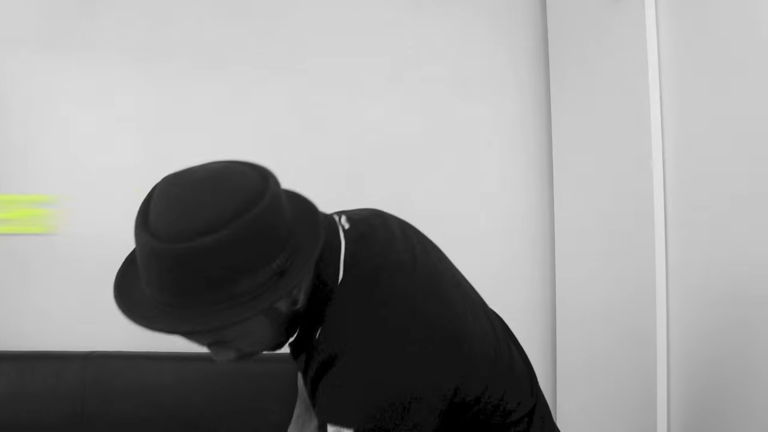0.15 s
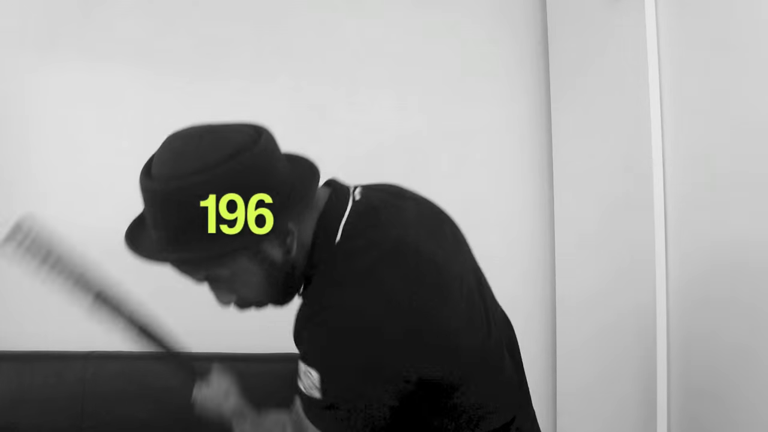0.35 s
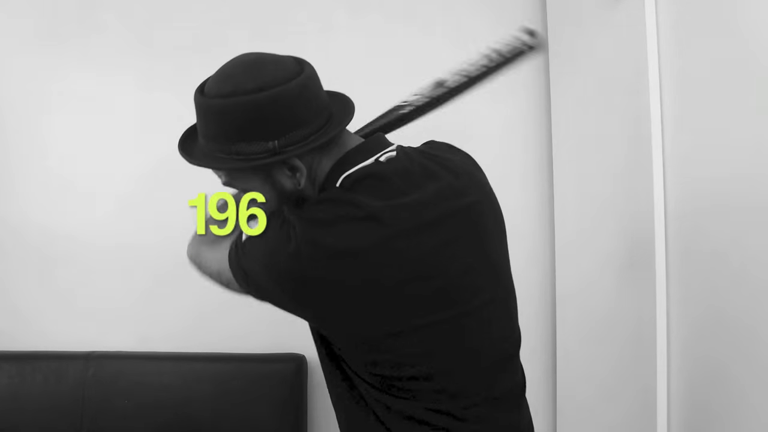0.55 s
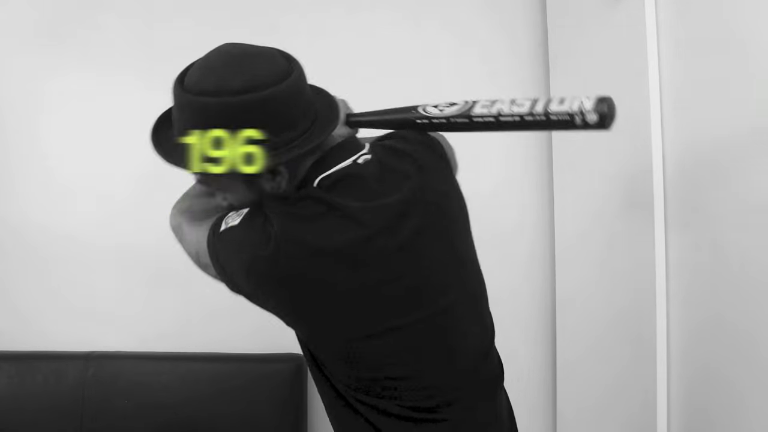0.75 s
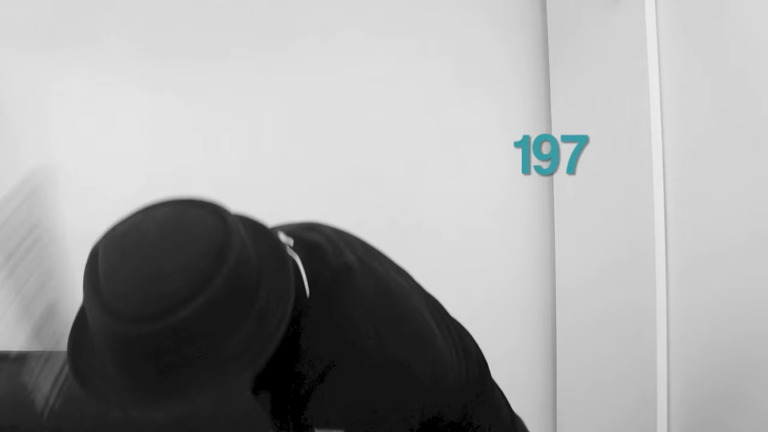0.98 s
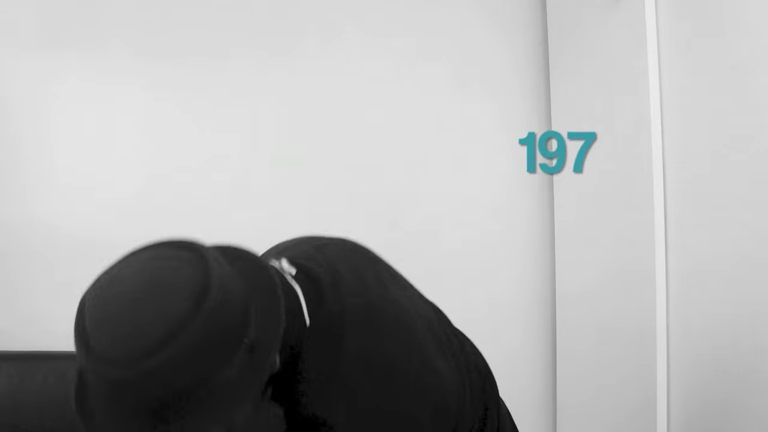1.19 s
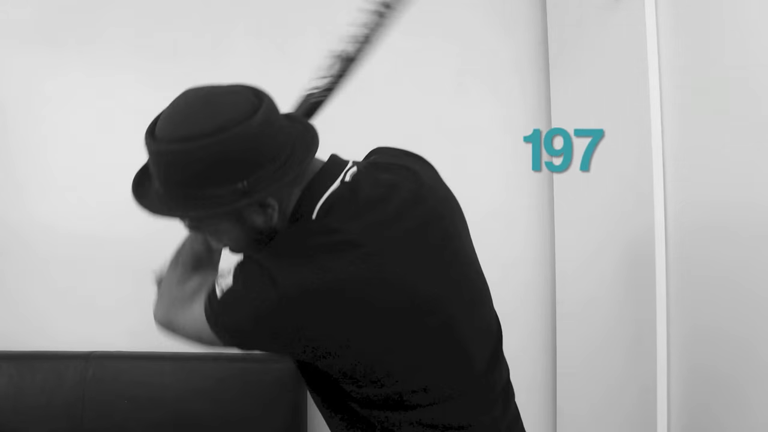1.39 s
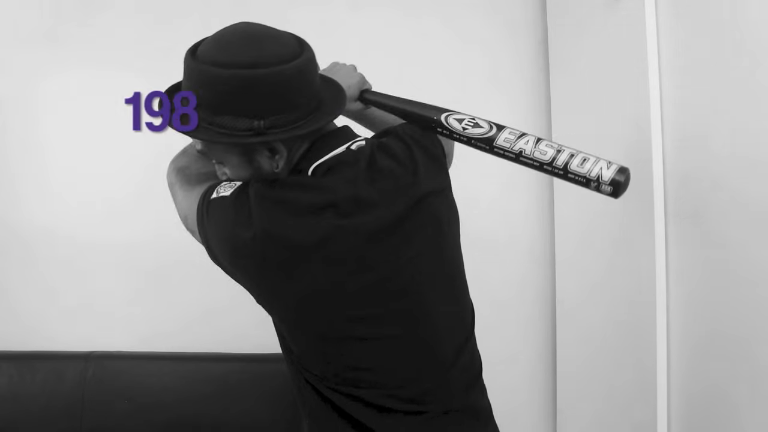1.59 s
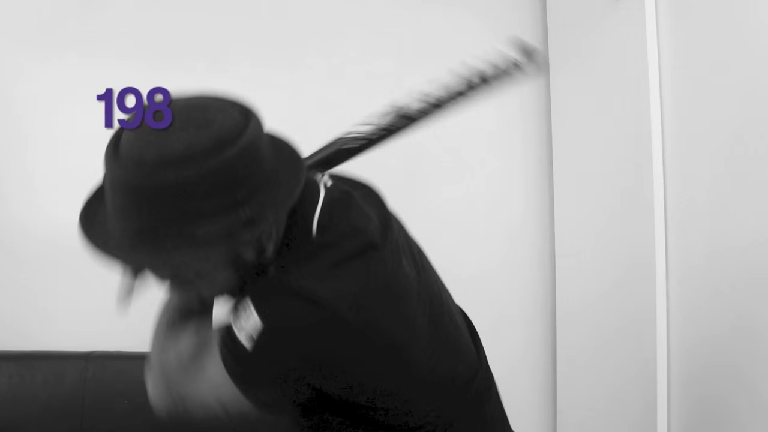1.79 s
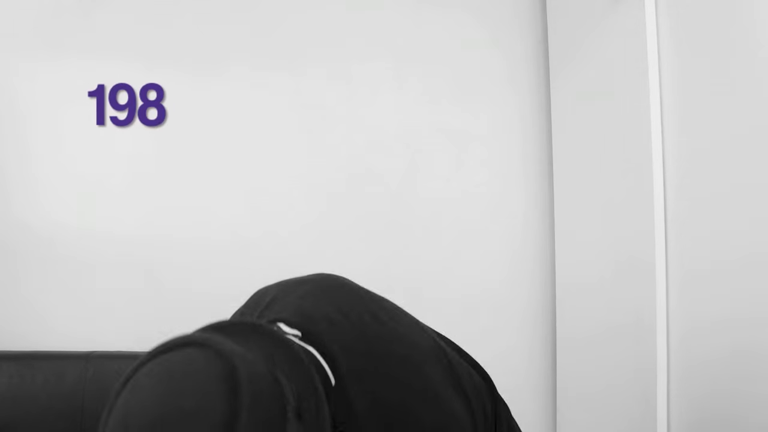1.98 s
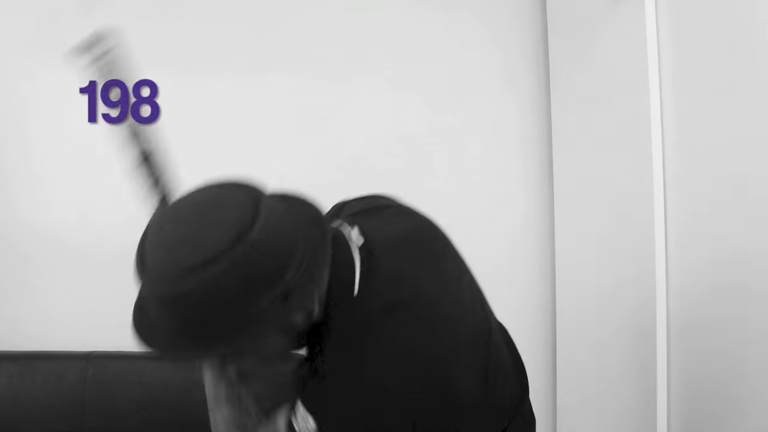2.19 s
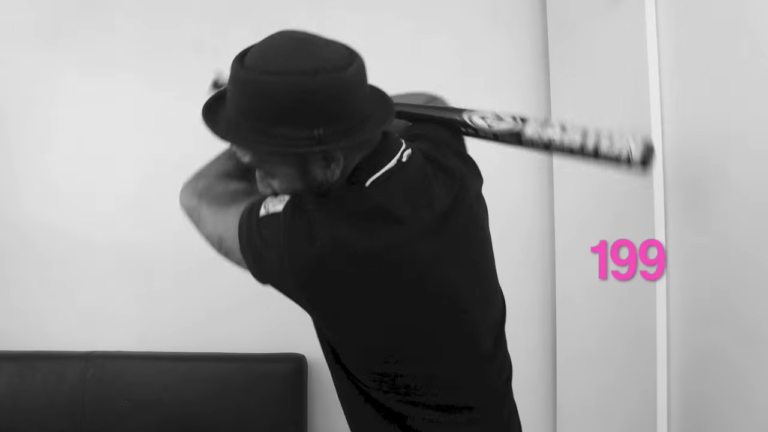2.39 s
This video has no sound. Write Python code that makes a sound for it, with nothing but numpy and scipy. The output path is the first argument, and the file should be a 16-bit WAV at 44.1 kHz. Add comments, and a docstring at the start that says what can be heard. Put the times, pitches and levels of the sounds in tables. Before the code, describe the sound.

Three hard bat whacks on heaped clothes, sharp cloth slaps over dull thuds, in a small room

```python
"""Three hard cloth slaps over dull thuds: a bat comes down on clothes heaped on a bed in a small bare room.
Each slap is a pulse convolved with diffuse reflections; the thud and crushed cloth are shaped noise,
and decaying sines give the push into the mattress and the modes that hum on.
Between blows the cloth rustles and swishes as grained or banded noise, and the bed bumps softly.
A faint hiss lies beneath; the loudest peaks saturate the microphone."""
import sys
import numpy as np
from scipy import signal
from scipy.fft import rfft, irfft, next_fast_len
from scipy.io import wavfile
from scipy.ndimage import uniform_filter1d

SR = 44100
rng = np.random.default_rng(int(sys.argv[2]) if len(sys.argv) > 2 else 0)


def int16_out(signal):
    """Quantize to a 16-bit WAV file."""
    q = np.round(np.clip(np.atleast_2d(signal).T, -1, 1) * 32767)
    wavfile.write(sys.argv[1], SR, q.astype(np.int16))


N = 108045
T = np.arange(SR) / SR  # time axis of one event [s]
TOP_HZ = 15850  # upper band limit


def amp(db):
    """Level as gain: 20 dB is a factor of ten in amplitude."""
    return 10 ** (np.asarray(db) / 20)


def unit(x):
    """Normalization to an rms of 1."""
    return x / np.sqrt(np.mean(x ** 2) + 1e-20)


def along(points, hz):
    """Linear interpolation of (frequency [Hz], value) points on a logarithmic frequency axis."""
    f, v = np.transpose(points)
    return np.interp(np.log(hz + 1), np.log(f + 1), v)


def filtered(x, response):
    """Linear filtering: the spectrum multiplied by a frequency response."""
    n = x.shape[-1]
    m = next_fast_len(n + SR // 4)  # padding against wrap-around
    return irfft(rfft(x, m) * response(np.fft.rfftfreq(m, 1 / SR)), m)[..., :n]


def add(track, s, x):
    """Superposition: x is summed into the track from time s."""
    i = max(0, round(s * SR))
    track[:, i:i + x.shape[-1]] += x[..., :max(0, N - i)]


def band(hz, octaves):
    """Bell-shaped band response around hz, symmetric in octaves."""
    return lambda f: 1 / (1 + (np.log2((f + 1) / hz) / octaves) ** 2 / 2) ** 2


def spectrum(points):
    """Frequency response through (frequency [Hz], level [dB]) points."""
    return lambda f: amp(along(points, f))


def tilt(hz, db):
    """Spectral slope in dB per octave, flattening at the lowest frequencies."""
    return amp(db * np.log2((hz + 100) / 1000))


def envelope(t, rise, hold, t60):
    """Linear rise, hold, then exponential decay by 60 dB in t60."""
    return np.clip(t / rise, 0, 1) * amp(-60 * np.maximum(t - rise - hold, 0) / t60)


def mode(t, hz, t60, rise):
    """Damped resonance: a sine of random phase that swells and decays exponentially."""
    swell = 1 - np.exp(-t / rise)
    return swell * amp(-60 * t / t60) * np.sin(2 * np.pi * (hz * t + rng.random()))


def grain(n, db, size):
    """Amplitude modulation by smoothed noise, db deep (rms)."""
    return amp(db * unit(uniform_filter1d(rng.standard_normal(n), size)))


def diffuse(n, response):
    """Diffuse field: coloured noise whose left-right correlation varies with frequency; rms 1."""
    # correlation of the two channels: (frequency [Hz], likeness [1], limited to -1..1 below)
    alike = [(100, 0.99), (700, .95), (1300, 0.82), (2300, 0.6), (3500, 0.47), (5000, 0.04), (6500, -0.38),
             (9000, -1.1), (14000, 0.23)]

    def mid_side(f):
        turn = np.arccos(np.clip(along(alike, f), -1, 1)) / 2
        return response(f) * np.array([np.cos(turn), np.sin(turn)])

    mid, side = filtered(rng.standard_normal((2, n)), mid_side)
    return unit(np.array([mid + side, mid - side]))


def blows():
    """Impact: air is pressed out, then the blow excites cloth, mattress and room at once."""
    # the three blows: (time [s], slap level [dB], slap tilt [dB/octave], thud level [dB],
    # thud pitch [Hz], thud width [octaves], ring level [dB], air squeeze level [dB])
    strokes = [(0.2464, 25.5, -1, -13.5, 365, 0.46, 0, -17), (1.1714, 23, -1.5, -13.5, 507, 1, 1.5, -25),
               (2.066, 26, -1, -10, 660, 0.23, 2, -20)]
    out = np.zeros((2, N))
    squeeze_s = 0.00702  # the air starts this long before the blow lands
    for s, slap_db, tilt_db, thud_db, thud_hz, width, ring_db, squeeze_db in strokes:
        impact = slap(slap_db, tilt_db) + crush() + thud(thud_db, thud_hz, width)
        add(out, s, impact + push() + ring(ring_db) + boom())
        add(out, s - squeeze_s, squeeze(squeeze_db, squeeze_s))
    return out


def slap(db, tilt_db):
    """Convolution: the room's impulse response excited by the cloth's short pulse."""
    # spectrum of the cloth slap: (frequency [Hz], level [dB])
    slap_points = [(30, -23), (90, -11.5), (170, -5), (300, 3.5), (600, -0.5), (1200, 5.5), (2500, 7.5),
                   (4000, 4), (7000, 4), (10000, -1), (13000, -8.5), (15500, -41)]
    pulse = click(slap_points, tilt_db)
    return amp(db) * signal.fftconvolve(room(T), pulse[None], axes=1)[:, :SR]


def click(points, tilt_db, size=2048):
    """Minimum phase: the folded cepstrum gives the most compact causal pulse of a spectrum."""
    hz = np.fft.rfftfreq(size, 1 / SR)
    cepstrum = irfft(np.log(amp(along(points, hz)) * tilt(hz, tilt_db)))
    cepstrum[1:size // 2] *= 2
    cepstrum[size // 2 + 1:] = 0
    return irfft(np.exp(rfft(cepstrum)))


def room(t):
    """Reverberation: direct sound, then dense reflections that build up and decay band by band."""
    # reverberation time: (frequency [Hz], t60 [s])
    room_t60 = [(60, .35), (200, 0.32), (700, 0.37), (2000, 0.27), (6000, 0.32), (14000, 0.26)]
    hold_s, build_s = 0.022, 0.042  # build_s: time for a rise of 1 in gain
    first, direct = 0.49, 0.08  # gain of the first reflections, direct pulse
    hz, s, z = signal.stft(diffuse(len(t), np.ones_like), SR, nperseg=256)
    fade = amp(-60 * np.maximum(s - hold_s, 0) / along(room_t60, hz)[:, None])
    tail = signal.istft(z * fade, SR)[1][:, :len(t)]
    tail *= np.minimum(first + t / build_s, 1)
    tail /= np.linalg.norm(tail[0])
    tail[:, 0] += direct
    return tail


def crush():
    """Friction: the pile of cloth crushed under the bat crackles as modulated bright noise."""
    # spectrum of the crushed cloth: (frequency [Hz], level [dB])
    crush_points = [(60, -8), (110, -9.5), (300, 4), (800, 1.5), (1500, 0.5), (2700, 0), (5000, 0),
                    (10000, -9), (15500, -17)]
    crackle = unit(grain(SR, 2, size=50) * diffuse(SR, spectrum(crush_points)))
    return amp(-12) * envelope(T, rise=0.0097, hold=0.024, t60=0.084) * crackle


def thud(db, hz, width):
    """Heavily damped body: a low band of noise with an abrupt onset and short decay."""
    return amp(db) * diffuse(SR, band(hz, width)) * envelope(T, 0.0003, hold=0.011, t60=0.12)


def push():
    """Damped resonance of the mattress as it gives way."""
    return amp(-12.5) * mode(T, hz=176, t60=0.19, rise=0.0011)


def ring(db):
    """Modal superposition: the blow sets resonances of bed and room ringing."""
    # modes: (frequency [Hz], level before a small random spread [dB], t60 [s], rise time constant [s])
    resonances = [(177.9, -23, 0.2, 0.0092), (199, -23.5, 0.23, 0.0073), (342, -19.5, 0.23, 0.0023),
                  (458.5, -23, 0.2, 0.0055), (536.7, -17.5, 0.29, 0.0072), (714, -11.5, 0.15, 0.0041),
                  (1061, -17.5, 0.22, 0.0027), (1280, -22, 0.22, .01), (1959, -24, 0.35, 0.0049)]
    total = 0
    for hz, mode_db, t60, rise in resonances:
        level_db = db + mode_db + rng.normal(0, 0.6)
        total = total + amp(level_db) * mode(T, hz, t60, rise)
    return total


def boom():
    """Lowest room mode: a standing wave that swells and decays."""
    return amp(-20) * lowest_mode()


def lowest_mode():
    """Eigenfrequency of the room, at full amplitude before swell and decay."""
    return mode(T, hz=54.4, t60=0.4, rise=0.03)


def squeeze(db, rise_s):
    """Turbulence: air pressed out swells as low-passed noise until the blow lands."""
    air = diffuse(SR, lambda f: 1 / (1 + (f / 1030) ** 10))  # upper edge [Hz]
    return amp(db) * envelope(T, rise_s, 0, t60=0.0072) * air


def rustles():
    """Sliding friction: dragged and shifted cloth gives short, finely grained noise."""
    # strokes: (time [s], level [dB], rise [s], hold [s], t60 [s], tilt [dB/octave])
    drags = [(0, -39, 0.0067, 0.03, 0.8, -2), (0.165, -42.5, 0.058, 0.012, 0.41, -1),
             (0.509, -37.5, 0.034, 0.02, 0.79, 1.16), (0.668, -47, 0.018, 0.089, 0.33, -1),
             (0.982, -40, .005, 0.007, 0.14, 1), (1.3, -43.5, 0.025, 0.095, 0.97, -0.5),
             (1.462, -41, .004, 0.0089, 0.39, 2.5), (1.517, -47, .06, 0.098, 0.22, 0),
             (2.2, -43, 0.042, 0.091, 0.39, -1.5), (2.362, -43.5, 0.021, 0.072, .5, .5)]
    # spectrum of sliding cloth: (frequency [Hz], level [dB])
    cloth_points = [(40, -35), (150, -9.5), (300, 2), (800, -2.5), (2500, -1), (4500, -3.5), (8000, -4.5),
                    (11500, -12), (15000, -27)]
    out = np.zeros((2, N))
    for s, db, rise, hold, t60, tilt_db in drags:
        cloth = diffuse(SR, lambda f: spectrum(cloth_points)(f) * tilt(f, tilt_db))
        texture = unit(grain(SR, 2, size=120) * cloth)
        add(out, s, amp(db) * envelope(T, rise, hold, t60) * texture)
    return out


def noise_bursts(events):
    """Band-limited noise under an envelope, one burst for each event."""
    out = np.zeros((2, N))
    for s, db, hz, width, rise, hold, t60 in events:
        add(out, s, amp(db) * envelope(T, rise, hold, t60) * diffuse(SR, band(hz, width)))
    return out


def swishes():
    """Fabric friction in a limited band: brief bright swishes."""
    # swishes: (time [s], level [dB], centre [Hz], width [octaves], rise [s], hold [s], t60 [s])
    strokes = [(0.015, -44.5, 2800, 0.45, .02, 0.041, 0.11), (1.0, -53, 5060, 0.18, .015, 0.027, .15),
               (1.66, -54, 1480, 0.28, .03, 0.025, 0.12), (1.755, -55, 2390, 0.74, .005, 0.083, .15),
               (1.792, -46, 6600, 0.63, .08, 0.037, 0.24)]
    return noise_bursts(strokes)


def bumps():
    """Damped structures: bed and floor answer in low bumps and narrow-band creaks."""
    # bumps: (time [s], level [dB], centre [Hz], width [octaves], rise [s], hold [s], t60 [s])
    knocks = [(0, -31.5, 278, 0.45, 0.00075, 0.012, 0.26), (.139, -39.5, 224, 1, 0.0016, .025, 0.27),
              (.805, -49, 454, 0.89, .004, 0.0085, 0.13), (.82, -51.5, 132, .3, .01, .015, .12),
              (1.32, -48, 158, 0.23, .015, 0.041, .25), (1.755, -49, 435, 0.9, 0.009, 0.013, 0.2),
              (1.79, -50.5, 520, 0.23, 0.0064, 0.032, .15), (1.93, -50.5, 247, 0.93, 0.055, 0.06, .15),
              (2.21, -37.5, 405, 0.13, 0.0065, .025, 0.3), (2.25, -44.5, 1200, 0.12, 0.0049, 0.035, 0.27)]
    return noise_bursts(knocks)


def low_swells():
    """Modal excitation: a bump or the air pushed by the swing makes the lowest room mode swell."""
    # low swells of the lowest room mode: (time [s], level [dB])
    swells = [(0, -35), (1.1, -44), (1.989, -37)]
    out = np.zeros((2, N))
    for s, db in swells:
        add(out, s, amp(db) * lowest_mode())
    return out


def hiss():
    """Stationary noise: the room's steady diffuse background."""
    # background spectrum: (frequency [Hz], level [dB])
    floor_points = [(25, -14), (60, -4.5), (300, -5), (1000, -4), (5000, -7), (11000, -15.5), (15000, -31)]
    return amp(-54) * diffuse(N, spectrum(floor_points))


def scene():
    """Superposition of all sources, placed slightly left by an interchannel time difference."""
    mix = blows() + rustles() + swishes() + bumps() + low_swells() + hiss()
    lead_s = 0.00003  # left ahead of right
    sides = np.array([[1], [-1]])
    return filtered(mix, lambda f: np.exp(1j * np.pi * f * lead_s * sides) * (f < TOP_HZ))


def record(dry):
    """Nonlinear transduction: a low cut, soft saturation of the loudest peaks, then the band limit."""
    low_cut_hz = 65
    dry = signal.sosfilt(signal.butter(2, low_cut_hz, "high", fs=SR, output="sos"), dry)
    ceiling, knee = 0.98, 3.6  # limit in amplitude, sharpness of the bend
    clipped = dry / (1 + np.abs(dry / ceiling) ** knee) ** (1 / knee)
    return filtered(clipped, lambda f: f < TOP_HZ)


dry = scene()
out = record(dry)
int16_out(out)
```